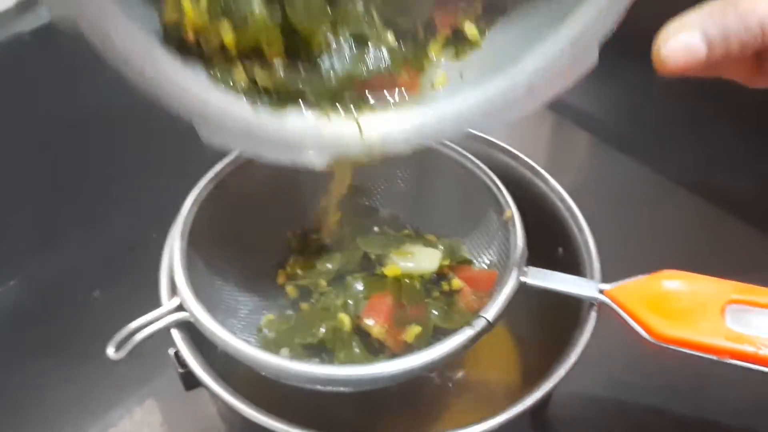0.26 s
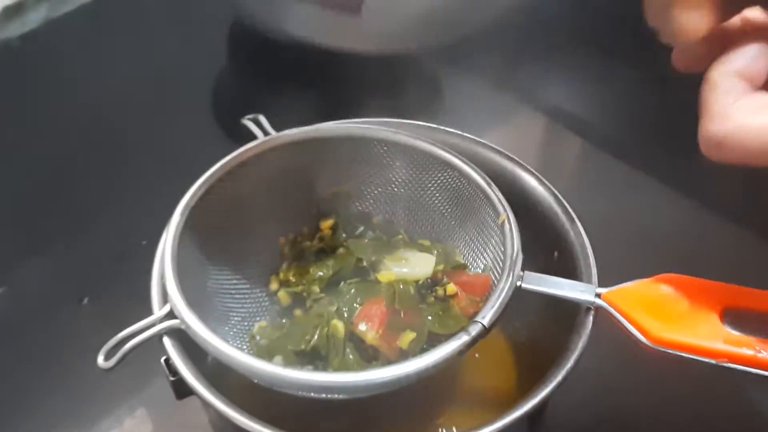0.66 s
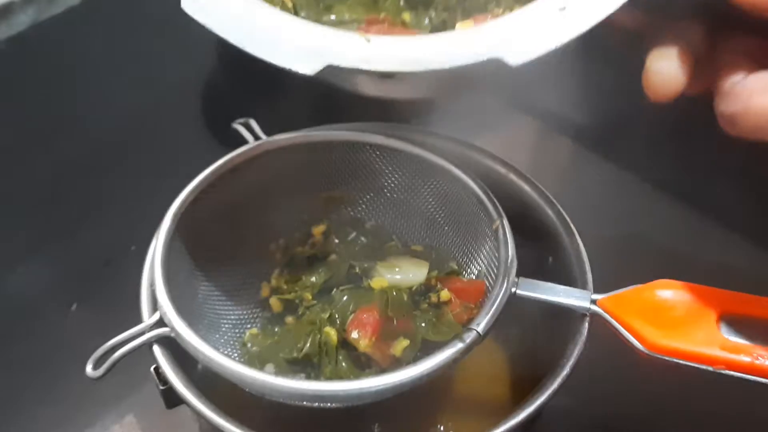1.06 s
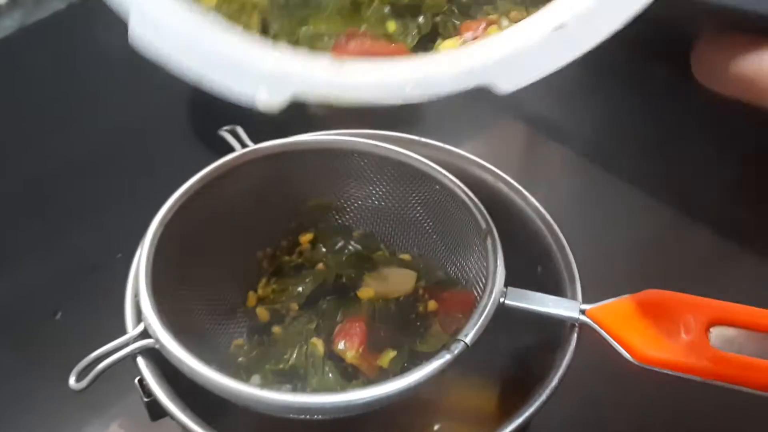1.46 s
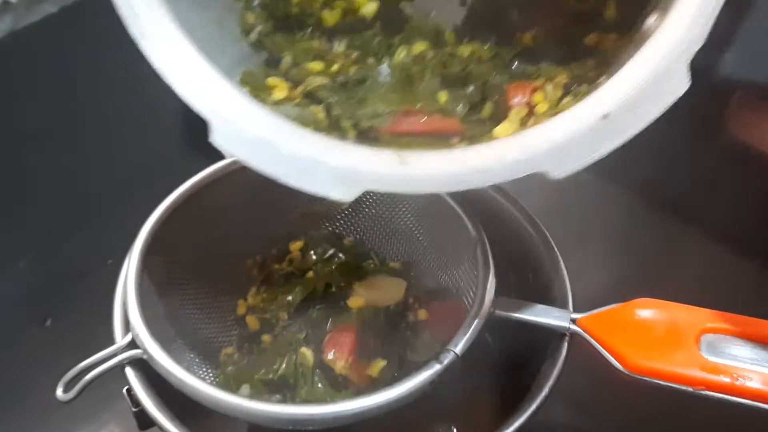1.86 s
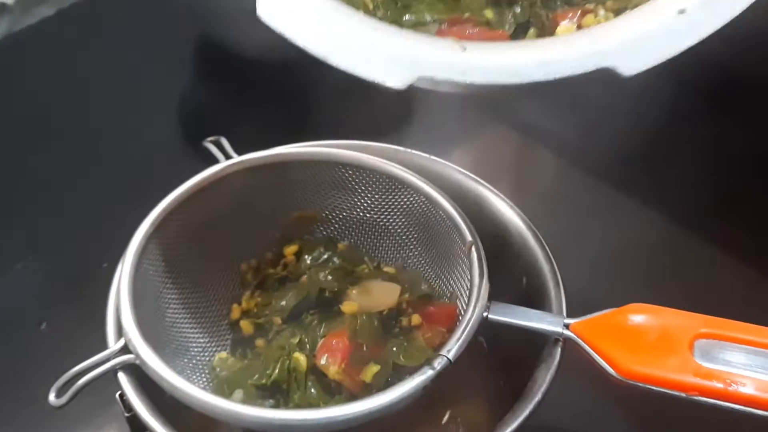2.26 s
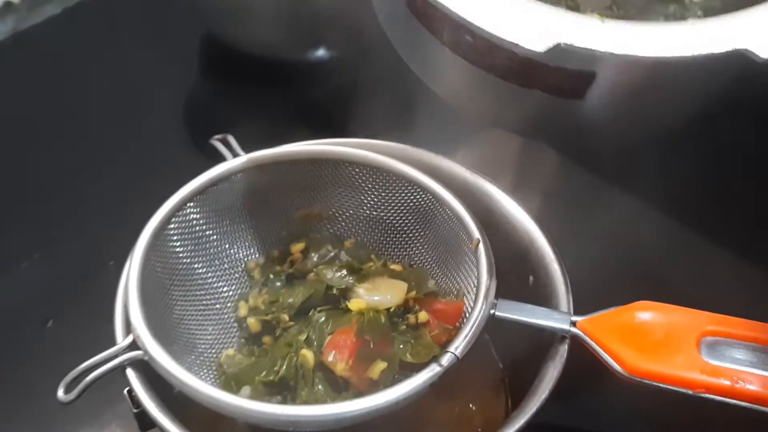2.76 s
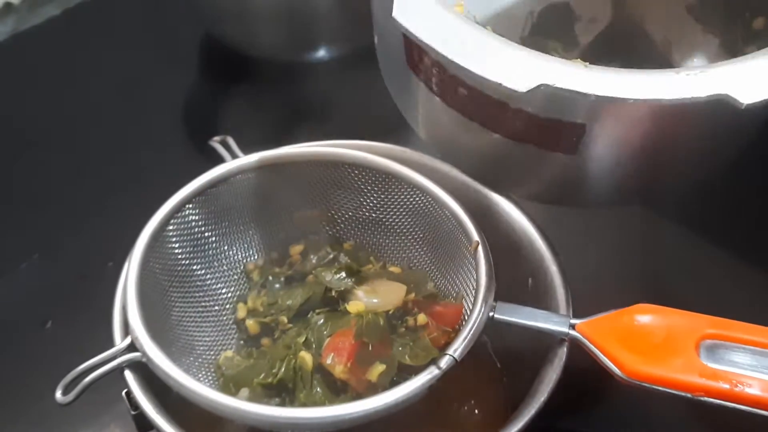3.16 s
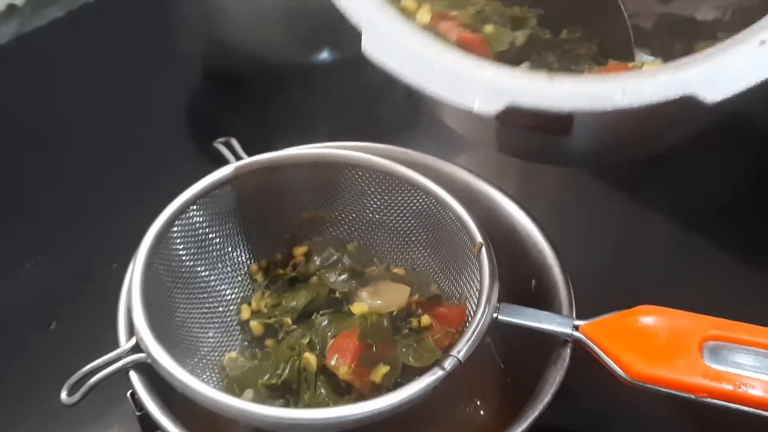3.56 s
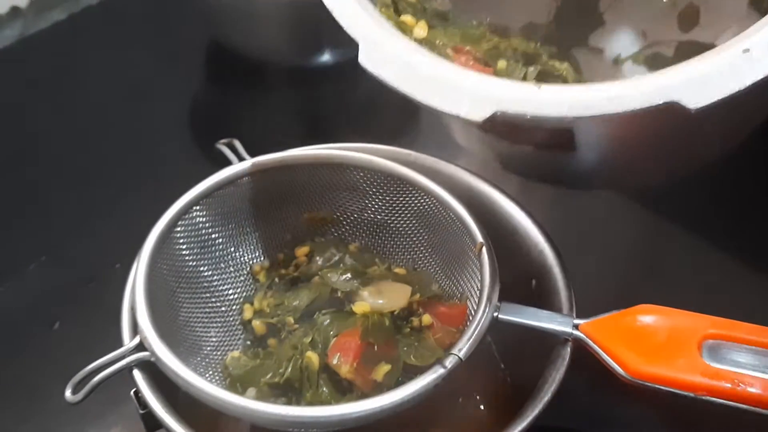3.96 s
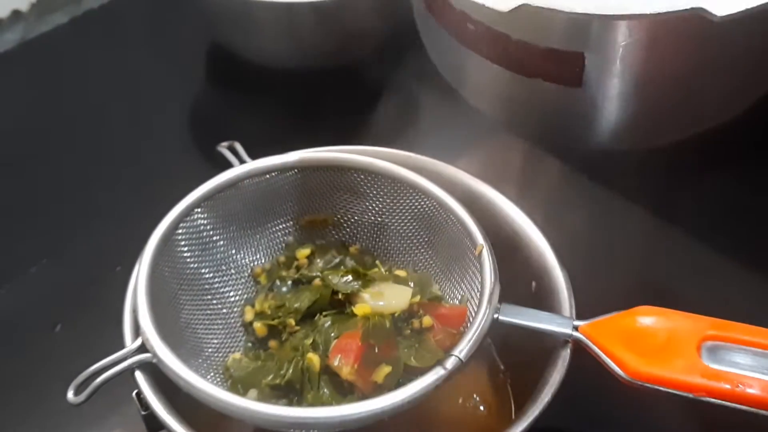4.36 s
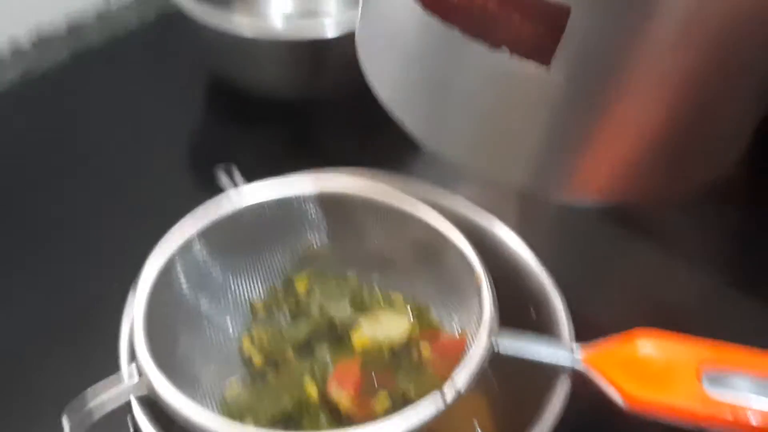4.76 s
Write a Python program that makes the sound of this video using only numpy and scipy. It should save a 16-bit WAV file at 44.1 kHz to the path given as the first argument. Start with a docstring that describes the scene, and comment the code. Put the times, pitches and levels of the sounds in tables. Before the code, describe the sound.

A steady low fan hum and airy rush lies under everything in a small, hard kitchen, heard close. From 0 to 0.7 s broth trickles quietly, with tiny drop ticks and a soft wet plop near 0.47; the strainer rattles lightly at 0.6. Wet leaves slip softly until about 1.4, while the pan taps and briefly grazes the ringing steel bowl at 1.1-1.2. A faint plop follows at 1.5. At 1.8 the pan knocks on the hob, then drags in short, grainy, high singing strokes from 2.0 to 2.3. A quieter stretch has a faint trickle, slips and ticks. The loudest blows come at 3.18-3.34: a solid knock and two bright clinks. A shrill rim rub with small clinks follows at 3.6, then a duller double knock at 3.85. At 4.24 the pan is bumped and skids, pinging a vessel at 4.4. Small ticks, a dull bump and a trickle finish.

```python
"""Over the low hum and rush of a fan, cooked greens drain from a heavy metal pan into a steel strainer in a bowl.
Broth trickles as drops tick and clumps plop; the strainer rattles, leaves slip and the pan taps and grazes the bowl.
The pan then knocks and drags on the hob; knocks, clinks on steel and singing rubs of its rim follow.
It is bumped, skids and pings on a vessel before the last ticks and trickle.
Blows and strokes of noisy force ring resonant bodies in a small hard kitchen; faint tones and dull bumps lie behind."""
import sys
import numpy as np
from scipy import signal
from scipy.fft import rfft, irfft, next_fast_len
from scipy.io import wavfile
from scipy.ndimage import map_coordinates

SR = 44100
rng = np.random.default_rng(int(sys.argv[2]) if len(sys.argv) > 2 else 0)


def output_pcm(signal):
    """Save a mono or channel-first signal as 16-bit PCM at the path in sys.argv[1].

    Samples are clipped to [-1, 1] before scaling.
    """
    pcm = np.clip(np.atleast_2d(signal).T, -1, 1) * 32767
    wavfile.write(sys.argv[1], SR, np.round(pcm).astype(np.int16))


N = 221029  # length in samples


def amp(db):
    """Decibels to gain."""
    return 10 ** (np.asarray(db) / 20)


def unit(x):
    """Scale to rms 1."""
    return x / np.sqrt(np.mean(x ** 2) + 1e-20)


def along(points, hz):
    """Read a curve of (Hz, value) points on a log frequency axis."""
    point_hz, values = np.transpose(points)
    return np.interp(np.log(hz + 1), np.log(point_hz), values)


def filtered(x, response):
    """Shape the spectrum of x by a complex response of frequency."""
    n = x.shape[-1]
    padded = next_fast_len(n + 8192)
    spectrum = rfft(x, padded) * response(np.fft.rfftfreq(padded, 1 / SR))
    return irfft(spectrum, padded)[..., :n]


def add(track, s, x):
    """Mix x into the track from time s."""
    start = max(round(s * SR), 0)
    track[:, start:start + x.shape[1]] += x[:, :max(N - start, 0)]


def wobble(rate):
    """A smooth random curve, rate knots a second."""
    return map_coordinates(rng.standard_normal(256), [np.arange(N) * rate / SR], mode='mirror')


def swells(strokes, rise_db_per_s, fall_db_per_s):
    """Every stroke swells, holds and fades at the rates of its kind; overlapping strokes add in power."""
    t = np.arange(N) / SR
    power = np.zeros(N)
    for s, hold, db in strokes:
        before, after = np.maximum(s - t, 0), np.maximum(t - s - hold, 0)
        below_db = rise_db_per_s * before + fall_db_per_s * after
        power += amp(db - np.minimum(below_db, 100)) ** 2
    return np.sqrt(power)


def stereo_noise(size, likeness):
    """Noise at the two ports whose mid and side mix gives a likeness that varies with frequency."""
    turn = lambda hz: np.arccos(likeness(hz)) / 2
    mid_side = lambda hz: np.array([np.cos(turn(hz)), np.sin(turn(hz))])
    mid, side = filtered(rng.standard_normal((2, size)), mid_side)
    return np.array([mid + side, mid - side])


def pair(size, alike):
    """Noise nearly the same at both ports in the bass, only partly alike higher up."""
    return stereo_noise(size, lambda hz: along([(350, 0.98), (900, np.clip(alike, 0, 1))], hz))


def ring(force, modes, crack_db, vary_db=2):
    """Force rings a body's resonances, varied at random with the spot touched, plus an unpitched crack."""
    spot = amp(vary_db * rng.standard_normal(len(modes)))

    def response(f):
        body = amp(crack_db)
        for gain, (centre, width, db) in zip(spot, modes):
            body = body + gain * amp(db) * 1j * f * width / (centre * centre - f * f + 1j * f * width)
        return body
    return filtered(force, response)


# How the left-right difference varies with pitch: pitch_hz [Hz], share [fraction of the difference]
SHADOW = [(500, 0.12), (2000, 0.44), (5000, 0.18), (10000, 1.524)]


def split(x, bands, pan_db):
    """Each band of a sound at rms 1, panned by a share of the left-right difference that varies with pitch."""
    parts = []
    for edges in bands:
        bandpass = signal.butter(5, edges, 'bandpass', fs=SR, output='sos')
        parts.append(unit(signal.sosfilt(bandpass, x)))
    shadow_db = pan_db * along(SHADOW, np.mean(bands, axis=1))
    return np.array(parts) * amp(np.outer(shadow_db, [.5, -.5]))[:, :, None]


# Decay of the small hard room: pitch_hz [Hz], t60_s [s]
KITCHEN = [(200, 0.69), (800, 0.35), (2500, 0.35), (8000, 0.24), (15000, 0.19)]


def kitchen(x, room_db, bass_db=4, treble_db=-2):
    """Direct sound and a diffuse tail of decaying noise, weaker in the treble than in the bass."""
    hz, t, z = signal.stft(rng.standard_normal((2, SR // 2)), SR, nperseg=256)
    decay = amp(-60 * t / along(KITCHEN, hz)[:, None])
    build = 1 - np.exp(-t / 0.0013)
    tail = signal.istft(z * decay * build, SR, nperseg=256)[1]
    tone = [(700, bass_db), (3000, 0.48), (9000, treble_db)]
    tail = filtered(tail / np.linalg.norm(tail[0]), lambda f: amp(along(tone, f)))
    wet = amp(room_db) * signal.fftconvolve(x, tail, axes=1)
    wet[:, :x.shape[1]] += x
    return wet


# Thud, body, ring and sparkle of a blow: low_hz [Hz], high_hz [Hz]
BANDS = [(320, 1000), (1100, 3000), (3000, 7000), (7000, 14000)]
PIVOT_HZ = 3000  # brightness tilts the colour about this pitch


def strikes(table, modes, colour_db, crack_db, room_db, contact_t60, rise):
    """Each contact is a brief chatter of force that rings the body; its brightness tilts the colour."""
    out, t = np.zeros((2, N)), np.arange(SR // 6) / SR
    octaves = np.log2(np.mean(BANDS, axis=1) / PIVOT_HZ)
    for s, level_db, brightness_db, pan_db in table:
        force = pair(len(t), alike=0.019) * amp(-60 * t / contact_t60) * (1 - np.exp(-t / rise))
        parts = split(ring(force, modes, crack_db), BANDS, pan_db)
        shares = amp(np.array(colour_db) + brightness_db * octaves)
        sound = np.tensordot(shares / np.linalg.norm(shares), parts, 1)
        add(out, s, kitchen(amp(level_db) * sound, room_db))
    return out


# Body and hiss of a rub or flow: low_hz [Hz], high_hz [Hz]
RUB_BANDS = [(250, 3000), (3000, 16000)]


def rubbing(effort, modes, body_db, crack_db, pan_db, room_db, slips, spread_db, smooth):
    """Tiny uneven slips or splashes (slips a second) on a smooth hiss excite the body, scaled by the effort."""
    sizes = amp(spread_db * np.clip(rng.standard_normal(N), -2, 2))
    catches = (rng.random(N) < slips / SR) * sizes
    # each slip fades with a time constant of 2.1 ms
    grip = unit(signal.lfilter([1], [1, -np.exp(-1 / (0.0021 * SR))], catches))
    force = pair(N, alike=0.1) * (smooth + grip)
    body, hiss = split(ring(force, modes, crack_db), RUB_BANDS, pan_db)
    return kitchen(effort * (amp(body_db) * body + hiss), room_db)[:, :N]


def singing(table, modes, rise_db_per_s, fall_db_per_s, sing_db, sing_width_hz, **touch):
    """One sound per stroke: friction locks on to one added resonance, which sings."""
    sounds = []
    for s, hold, db, hz in table:
        effort = swells([(s, hold, db)], rise_db_per_s, fall_db_per_s)
        sounds.append(rubbing(effort, modes + [(hz, sing_width_hz, sing_db)], **touch))
    return sounds


def plate(x, t60=0.038, dense_db=-2):
    """Countless weak high modes of metal, as a decaying noise answer drawn afresh each call."""
    t = np.arange(SR // 16) / SR
    modes = filtered(rng.standard_normal(len(t)), lambda f: f > BANDS[1][0]) * amp(-60 * t / t60)
    answer = amp(dense_db) * modes / np.linalg.norm(modes) + (t == 0)
    return signal.fftconvolve(x, answer[None] / np.linalg.norm(answer), axes=1)[:, :N]


def dull_bumps(table, t60, width_hz, pan_db):
    """Short dull bumps, each noise ringing around its own low pitch."""
    out, t = np.zeros((2, N)), np.arange(SR // 3) / SR
    for s, hz, db in table:
        force = pair(len(t), alike=0.306)
        bump = unit(ring(force, [(hz, width_hz, 0)], crack_db=-89.5)) * (1 - np.exp(-t / 0.0019))
        add(out, s, bump * amp(db - 60 * t / t60) * amp([[pan_db / 2], [-pan_db / 2]]))
    return out


# Motor tones: pitch_hz [Hz], level_db [dB before the hum trim and waver]
HUM = [(134.6, -68), (199.2, -57)]
# Spectrum of the air rush: pitch_hz [Hz], density_db [relative dB per Hz]
AIR = [(25, -38), (70, -6.5), (130, -2), (200, -4), (320, -1.5), (450, -11.5), (780, -25.5), (1150, -29),
       (1480, -26), (1850, -21), (2600, -36), (12000, -29), (16000, -41.5)]
# Stereo likeness of the air: pitch_hz [Hz], likeness [correlation]
ALIKE = [(40, 0.23), (130, 0.71), (280, 1), (600, 0.23), (10000, .05)]


def fan(air_db=-55, hum_db=-1, waver_db=2, drift_rad=0.15, pan_db=4.0):
    """A low rush of shaped noise with motor tones slightly unsteady in level and phase."""
    t = np.arange(N) / SR
    air = stereo_noise(N, lambda hz: np.clip(along(ALIKE, hz), -1, 1))
    air = filtered(air, lambda hz: amp(along(AIR, hz)))
    sound = amp(air_db) * unit(air) * amp([[pan_db / 2], [-pan_db / 2]])
    for hz, db in HUM:
        level = amp(db + hum_db + waver_db * wobble(6.7)) * np.sqrt(2)
        sound = sound + level * np.sin(2 * np.pi * hz * t + drift_rad * wobble(4.1))
    return sound


# A faint tone comes and goes: full_s [s], hold_s [s], level_db [dB]
TONES = [(1.52, .14, -68), (4.02, 0.16, -67)]
TONE_HZ, TONE_WIDTH_HZ = 1132, 81
# A narrow band flickers: full_s [s], hold_s [s], level_db [dB before the flicker]
FLICKERS = [(2.42, 0.91, -66.5)]
FLICKER_HZ, FLICKER_WIDTH_HZ = 1803, 650


def faint_tones(flicker_depth_db=6, flicker_rate=22):
    """Two narrow bands of noise swell and fade; the upper also flickers at random."""
    def narrow(hz, width):
        return unit(filtered(pair(N, alike=0.22), lambda f: 1 / (1 + (2 * (f - hz) / width) ** 2)))
    tone = narrow(TONE_HZ, TONE_WIDTH_HZ) * swells(TONES, rise_db_per_s=400, fall_db_per_s=158)
    flicker = narrow(FLICKER_HZ, FLICKER_WIDTH_HZ) * swells(FLICKERS, rise_db_per_s=100, fall_db_per_s=96.0)
    return tone + flicker * amp(flicker_depth_db * wobble(flicker_rate))


# Bumps of the counter as things are handled: start_s [s], pitch_hz [Hz], level_db [dB]
THUMPS = [(3.287, 62, -45), (3.846, 195, -47), (4.71, 72, -51)]


def counter_thumps():
    """The counter answers handling with low, damped bumps."""
    return dull_bumps(THUMPS, t60=0.32, width_hz=83, pan_db=13.5)


# Broth runs through the mesh or sloshes: full_s [s], hold_s [s], effort_db [dB]
POUR = [(0.28, 0.35, -59), (2.36, 0.12, -64.5), (4.96, 0.083, -63)]
# Resonances of the broth: pitch_hz [Hz], width_hz [Hz], level_db [dB]
BROTH = [(526, 86, 6.5), (1120, 50, -3), (1850, 140, 3), (2450, 500, -3), (3970, 1700, -15),
         (5520, 920, -7)]


def broth():
    """Sparse equal splashes on a hiss excite broad liquid resonances."""
    flow = swells(POUR, rise_db_per_s=78, fall_db_per_s=71.5)
    return rubbing(flow, BROTH, body_db=-2.0, crack_db=-7, pan_db=1.5, room_db=1,
                   slips=150, spread_db=0, smooth=0.63)


# Wet leaves slip in the pan: full_s [s], hold_s [s], effort_db [dB]
FOOD = [(0.82, 0.45, -62), (1.25, 0.14, -58.5), (2.745, 0.022, -55.5), (2.97, 0.16, -66), (4.78, 0.05, -61)]
# Resonances of wet food: pitch_hz [Hz], width_hz [Hz], level_db [dB]
LEAVES = [(507, 35.6, 14.5), (5420, 1460, -6.5), (11170, 7900, -9.5)]


def slipping_leaves():
    """Soft, mostly smooth friction excites broad wet resonances."""
    slip = swells(FOOD, rise_db_per_s=402, fall_db_per_s=186.5)
    return rubbing(slip, LEAVES, body_db=-8.5, crack_db=-3, pan_db=4.0, room_db=-4.5,
                   slips=110, spread_db=0.5, smooth=1.8)


# Drops and bits of food hit the mesh: start_s [s], level_db [dB], brightness [dB per octave], pan_db [left-right dB]
TICKS = [(0.129, -68, 2, 7), (0.467, -57, -6.5, 4), (0.546, -61, -5, 4.5), (0.564, -62.5, -6.5, 12),
         (0.71, -64, 2, 12), (2.628, -69, -7.5, 16.5), (2.732, -58, -2, 4), (2.955, -69, 2, 4),
         (3.134, -68, 2, 4), (4.656, -66, 12, 3), (4.865, -62.5, -3, -12), (4.901, -63, -1, -12),
         (4.997, -61, -8, 13.5)]
# Energy shares of a tick: thud_db, body_db, ring_db, sparkle_db [dB]
TICK_COLOUR = (-17.5, -7.5, -0.5, 5)


def ticks():
    """Tiny impacts ring the wet food for a moment."""
    return strikes(TICKS, LEAVES, TICK_COLOUR, crack_db=-47.0, room_db=-5, contact_t60=0.013, rise=0.00026)


# Wet clumps land in the strainer: start_s [s], pitch_hz [Hz], level_db [dB]
PLOPS = [(0.466, 490, -42.5), (0.564, 474, -55), (1.503, 560, -52)]


def plops():
    """Each soft landing is a short bump at its own pitch."""
    return dull_bumps(PLOPS, t60=0.092, width_hz=110, pan_db=3)


# The pan grazes the bowl: full_s [s], hold_s [s], effort_db [dB]
GRAZE = [(1.115, 0.081, -50), (1.193, 0.019, -39.5)]
# Resonances of the bowl: pitch_hz [Hz], width_hz [Hz], level_db [dB]
BOWL = [(510, 90, -8), (1225, 25, 10), (1555, 35, 6), (1650, 90, 4), (1800, 90, 1), (3420, 110, 1),
        (3810, 180, -1), (4500, 500, -4), (10500, 3500, -13)]


def graze():
    """Dense, very uneven slips excite the bowl in sudden strokes."""
    effort = swells(GRAZE, rise_db_per_s=893.5, fall_db_per_s=804)
    return rubbing(effort, BOWL, body_db=3, crack_db=-4.0, pan_db=5.0, room_db=-16.0,
                   slips=1500, spread_db=11.5, smooth=1.0)


# The pan is pushed over the hob: full_s [s], hold_s [s], effort_db [dB], singing_pitch_hz [Hz]
SLIDES = [(2.01, 0.045, -50, 7800), (2.1, 0.017, -39, 7670), (2.19, 0.026, -34.5, 10800),
          (2.262, 0.014, -42, 10950)]
# Resonances of the pan's base: pitch_hz [Hz], width_hz [Hz], level_db [dB]
BASE = [(350, 25, 30), (1760, 200, 11), (2250, 200, 12), (2700, 130, 10), (4550, 150, -1), (12400, 400, 5)]


def slides():
    """The base catches and slips on the hob, so each push is grainy and sings."""
    pushes = singing(SLIDES, BASE, rise_db_per_s=235, fall_db_per_s=284, sing_db=15, sing_width_hz=170,
                     body_db=-6.0, crack_db=10, pan_db=2.5, room_db=-6.0,
                     slips=450, spread_db=4, smooth=0.5)
    return sum(plate(push) for push in pushes)


# The pan skids as it is set down: full_s [s], hold_s [s], effort_db [dB]
SETTLE = [(4.27, 0.02, -47.5)]
# Resonances of the pan's wall: pitch_hz [Hz], width_hz [Hz], level_db [dB]
WALL = [(1660, 16, 11), (1900, 100, 1), (2240, 110, 6), (2445, 60, 6), (2950, 120, -4), (3510, 40, -2),
        (4140, 90, -5), (4830, 60, -3), (5020, 60, -2), (6540, 100, -2), (8450, 350, -5), (10650, 300, -1)]


def skid():
    """A brief stroke of uneven slips excites the pan's wall."""
    effort = swells(SETTLE, rise_db_per_s=882, fall_db_per_s=176)
    return rubbing(effort, WALL, body_db=0.5, crack_db=-10.0, pan_db=4.5, room_db=1.5,
                   slips=320, spread_db=11, smooth=0.54)


def wavering(x, depth=.006, rate=70):
    """The pitch of a rubbed rim wanders as the contact moves, by a varying playback position."""
    position = np.arange(N) + np.cumsum(depth * np.gradient(wobble(rate)) * SR / rate)
    return np.array([map_coordinates(port, [position], order=5) for port in x])


# The rim rubs along steel: full_s [s], hold_s [s], effort_db [dB], singing_pitch_hz [Hz]
RUBS = [(3.605, 0.072, -44.5, 10600), (3.64, 0.025, -33, 8270), (3.945, 0.017, -55, 7800),
        (4.32, 0.066, -53, 10650)]
# Resonances of the rim: pitch_hz [Hz], width_hz [Hz], level_db [dB]
RIM = [(1220, 40, -5), (1660, 50, -13), (2280, 160, -9), (3490, 60, -16), (4610, 80, 2), (4900, 140, 1),
       (5500, 300, -10), (6340, 90, 2), (6650, 160, -4), (7270, 250, -9), (8210, 80, 4), (8380, 200, 1),
       (9070, 160, -6), (9366, 90, -3), (9546, 90, -3), (10150, 160, -6), (10570, 130, -1),
       (11900, 300, -11), (13120, 200, -11)]
RUB_TOP_HZ = 12100  # smooth rubbing excites little above this


def rubs():
    """Dense fine slips make the rim sing with a wandering pitch and a softened top."""
    strokes = singing(RUBS, RIM, rise_db_per_s=363.5, fall_db_per_s=998, sing_db=9, sing_width_hz=110,
                      body_db=-17.5, crack_db=-29, pan_db=5.5, room_db=-8.0,
                      slips=2500, spread_db=3, smooth=1.0)
    return filtered(wavering(sum(strokes)), lambda hz: 1 / np.sqrt(1 + (hz / RUB_TOP_HZ) ** 16))


# The strainer is jolted in the bowl: start_s [s], level_db [dB], brightness [dB per octave], pan_db [left-right dB]
RATTLES = [(0.617, -47.5, 2, 11), (0.686, -60.5, -13, 6), (0.735, -68, -1.5, 26), (1.799, -51.5, 6.5, 12)]
# Resonances of the strainer: pitch_hz [Hz], width_hz [Hz], level_db [dB]
STRAINER = [(1230, 45, 3), (1740, 90, -1), (1870, 50, 2), (2380, 60, -1), (3650, 200, -1), (4110, 200, 4),
            (4600, 220, -2), (5140, 120, -1)]
# Energy shares of a rattle or bump: thud_db, body_db, ring_db, sparkle_db [dB]
BUMP_COLOUR = (-45, 5, 2, -10.5)


def rattles():
    """Jolts ring the strainer and its dense high modes."""
    return plate(strikes(RATTLES, STRAINER, BUMP_COLOUR, crack_db=-15, room_db=-4.5,
                         contact_t60=0.02, rise=0.00012))


# The pan taps the bowl: start_s [s], level_db [dB], brightness [dB per octave], pan_db [left-right dB]
TAPS = [(1.103, -48.5, -4.5, 33), (1.19, -57, 5, 22), (1.2, -39.5, 3.5, 6)]
# Energy shares of a tap: thud_db, body_db, ring_db, sparkle_db [dB]
TAP_COLOUR = (-12, 4, 1.5, -4)


def taps():
    """Fast-rising blows ring the bowl."""
    return strikes(TAPS, BOWL, TAP_COLOUR, crack_db=-12.0, room_db=-4, contact_t60=0.025, rise=0.0001)


# The pan's wall is bumped: start_s [s], level_db [dB], brightness [dB per octave], pan_db [left-right dB]
BUMPS = [(4.243, -42, 4.5, 12)]


def bumps():
    """A longer contact rings the pan's wall and its dense high modes."""
    return plate(strikes(BUMPS, WALL, BUMP_COLOUR, crack_db=-14, room_db=-2, contact_t60=0.045, rise=0.00019))


# The rim clinks on steel: start_s [s], level_db [dB], brightness [dB per octave], pan_db [left-right dB]
CLINKS = [(3.29, -31, 0.5, 10), (3.339, -35.5, 2, 5), (3.639, -49, 12, 14), (3.667, -46, 0, 5)]
# Energy shares of a clink or ping: thud_db, body_db, ring_db, sparkle_db [dB]
CLINK_COLOUR = (-29.5, -14.5, -6, 2)


def clinks():
    """Very short contacts ring the rim, mostly in the treble."""
    return strikes(CLINKS, RIM, CLINK_COLOUR, crack_db=-36.5, room_db=-1.5, contact_t60=0.01, rise=0.00039)


# The pan pings a steel vessel: start_s [s], level_db [dB], brightness [dB per octave], pan_db [left-right dB]
PINGS = [(4.395, -38, 4.5, 7)]
# Resonances of the vessel: pitch_hz [Hz], width_hz [Hz], level_db [dB]
VESSEL = [(2420, 70, -7), (3520, 60, -20), (6500, 120, -4), (8200, 140, 4), (8580, 200, -2),
          (10700, 600, -3), (12800, 700, -4)]


def pings():
    """A short contact rings the vessel beside the pan."""
    return strikes(PINGS, VESSEL, CLINK_COLOUR, crack_db=-40, room_db=-4.5, contact_t60=0.018, rise=0.0008)


# The base knocks on the hob: start_s [s], level_db [dB], brightness [dB per octave], pan_db [left-right dB],
# thud_hz [Hz], flex_db [extra body from the flexing wall, dB]
KNOCKS = [(1.816, -41.5, 3, 3.5, 830, 4.5), (3.178, -34.5, -0.5, 6, 786, 1.5),
          (3.845, -46.5, -1, 5.5, 722, 14), (3.855, -52.5, 1, 4.5, 760, 17), (4.24, -49, 0.5, 4, 653, 0)]
# Resonances of the hob: pitch_hz [Hz], width_hz [Hz], level_db [dB]
HOB = [(520, 80, -1), (582, 25, 0), (720, 25, 5), (843, 25, 1), (1225, 50, 4), (1400, 90, -1),
       (1640, 90, 4), (1930, 100, 1), (2210, 60, 5), (2600, 150, -3), (5720, 300, -7), (6840, 250, -6),
       (7480, 110, -3), (9000, 400, -2), (11200, 1200, -3)]
# Energy shares of a knock: thud_db, body_db, ring_db, sparkle_db [dB]
KNOCK_COLOUR = (4.5, -7.5, -6, 10)
THUD_WIDTH_HZ, THUD_DB = 70, 8  # the resonance that the landing spot favours


def knocks():
    """Where the base lands sets the pitch of its thud; a flat landing flexes the wall too."""
    body_band = np.arange(len(BANDS)) == 1
    sound = np.zeros((2, N))
    for *blow, thud_hz, flex_db in KNOCKS:
        modes = HOB + [(thud_hz, THUD_WIDTH_HZ, THUD_DB)]
        colour_db = KNOCK_COLOUR + flex_db * body_band
        sound += strikes([blow], modes, colour_db, crack_db=1.5, room_db=0.0, contact_t60=0.03, rise=0.00042)
    return sound


def scene():
    """The background, wet food, moving metal and the blows of the pan."""
    background = fan() + faint_tones() + counter_thumps()
    food = broth() + slipping_leaves() + ticks() + plops()
    scrapes = graze() + slides() + skid() + rubs()
    blows = rattles() + taps() + bumps() + clinks() + pings() + knocks()
    return background + food + scrapes + blows


CEILING = .85  # full scale is 1
TOP_HZ = 15800


def record(dry):
    """The recorder rounds off the highest peaks and cuts steeply above its band limit."""
    rounded = dry / (1 + np.abs(dry / CEILING) ** 6) ** (1 / 6)
    return filtered(rounded, lambda hz: 1 / np.sqrt(1 + (hz / TOP_HZ) ** 160))


dry = scene()
out = record(dry)
output_pcm(out)
```